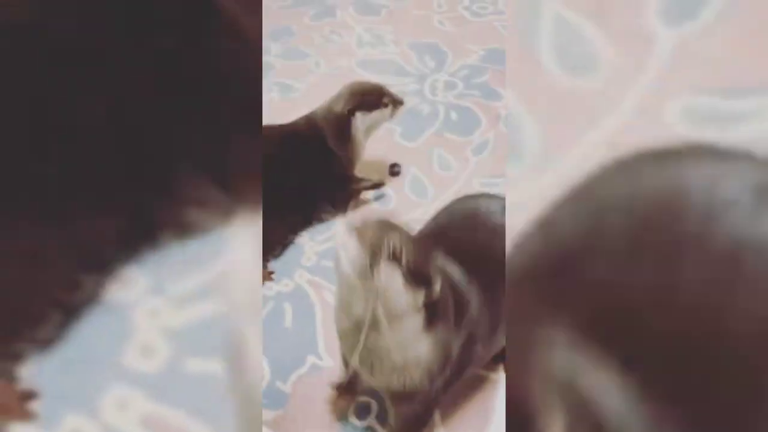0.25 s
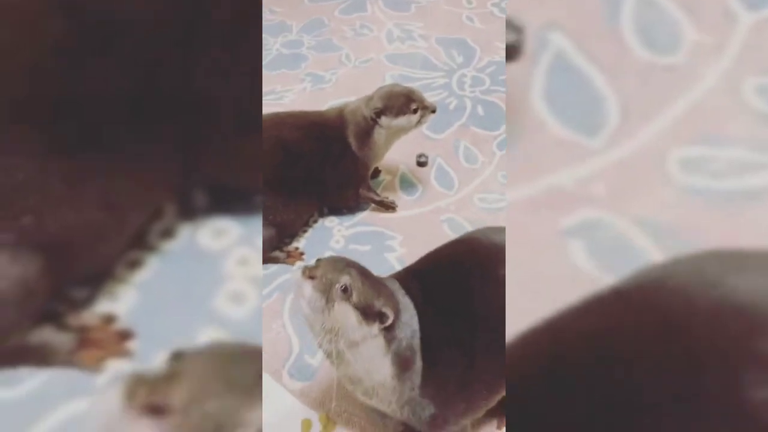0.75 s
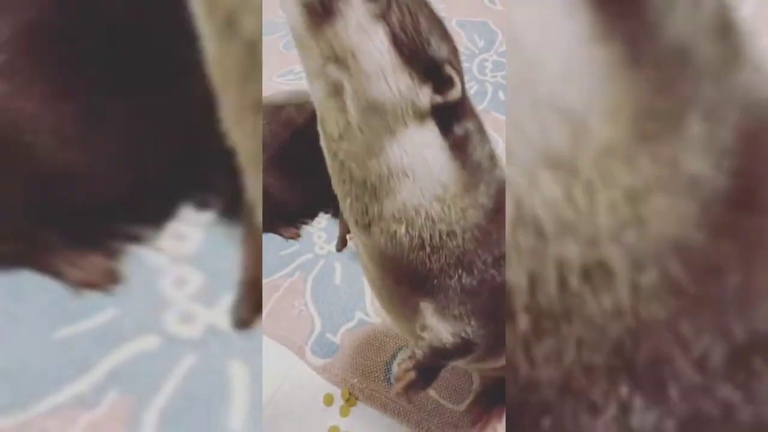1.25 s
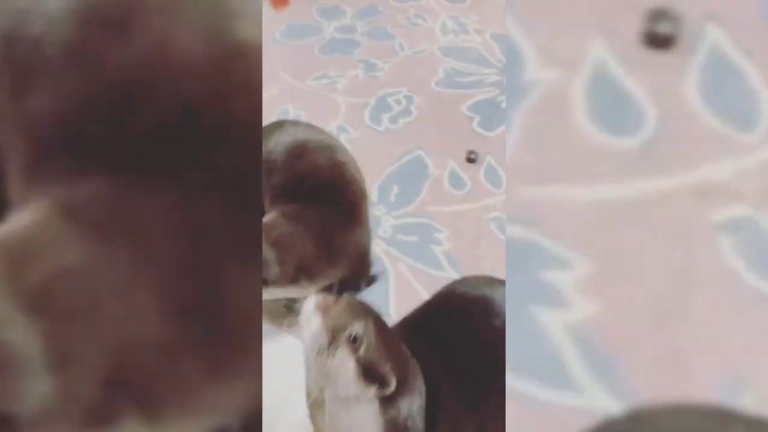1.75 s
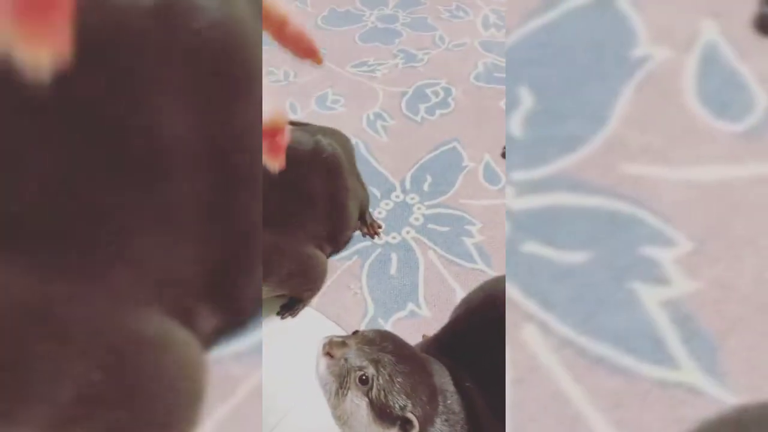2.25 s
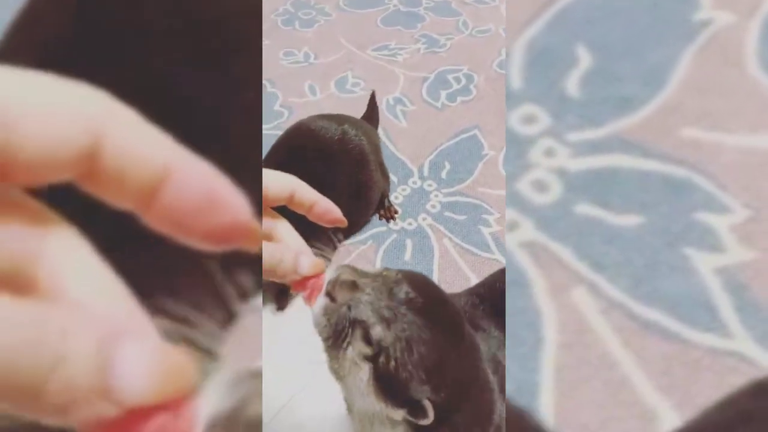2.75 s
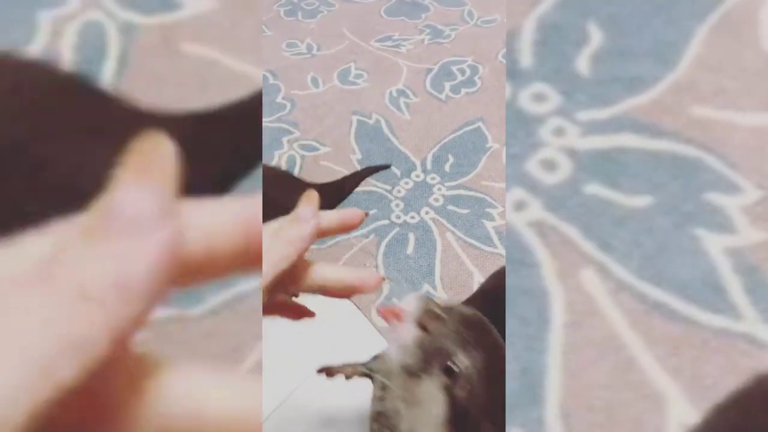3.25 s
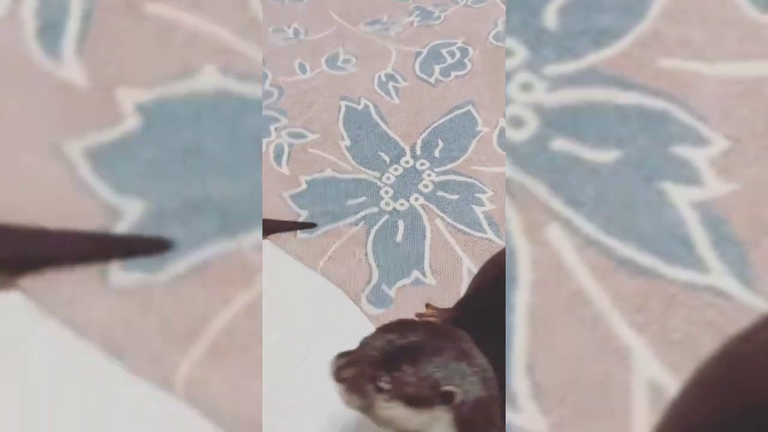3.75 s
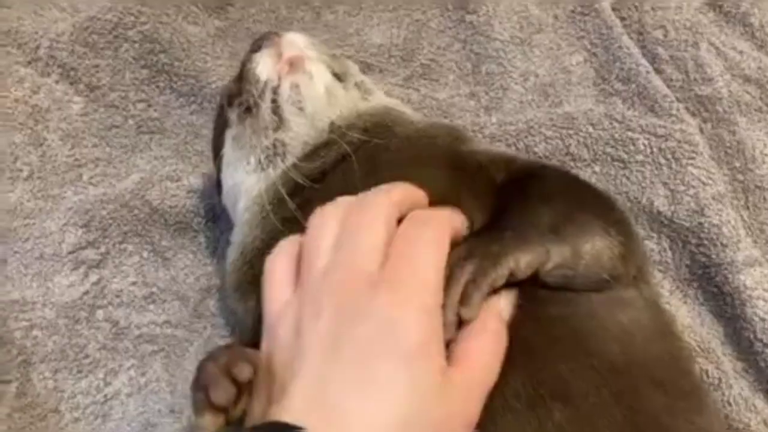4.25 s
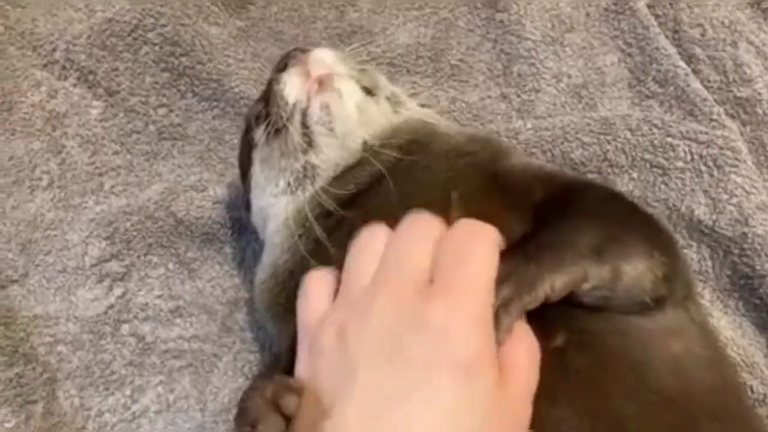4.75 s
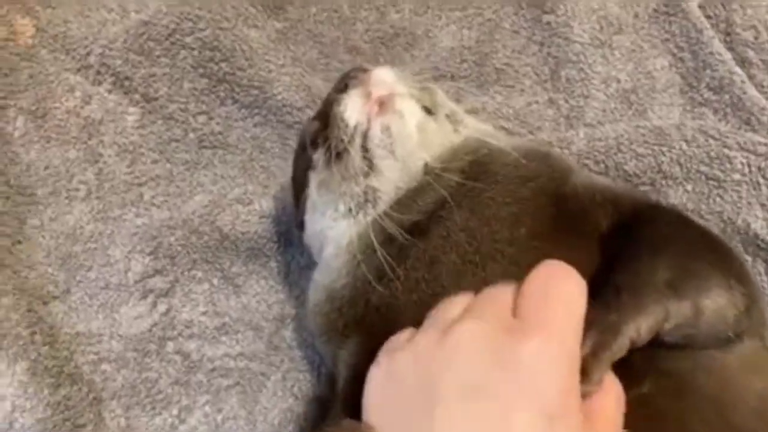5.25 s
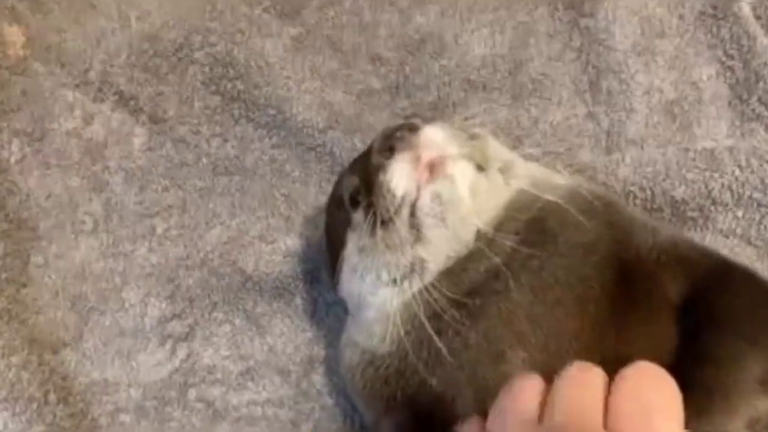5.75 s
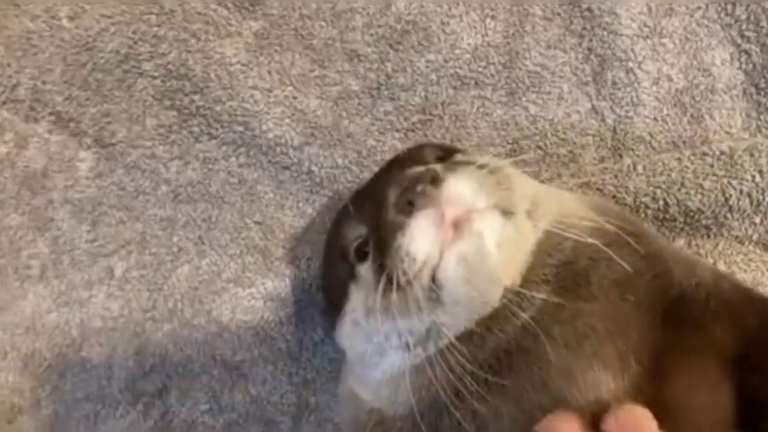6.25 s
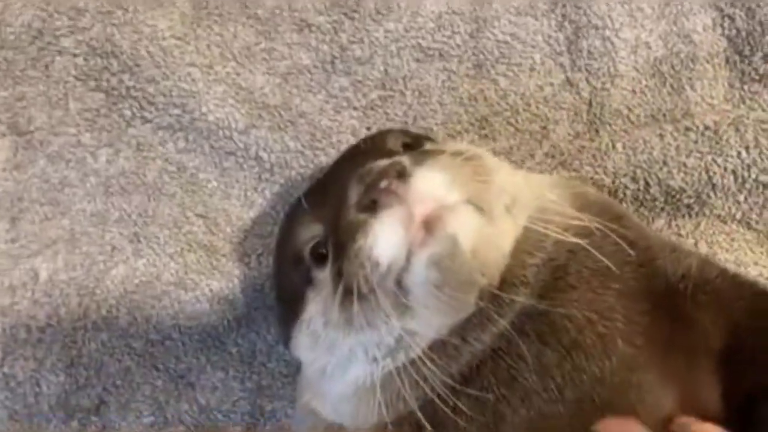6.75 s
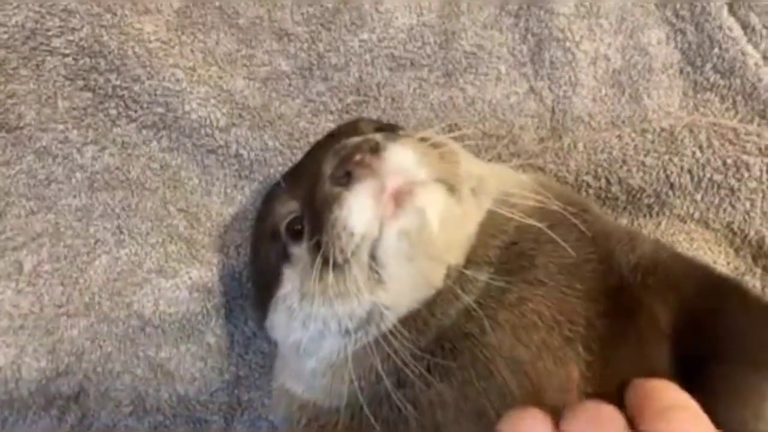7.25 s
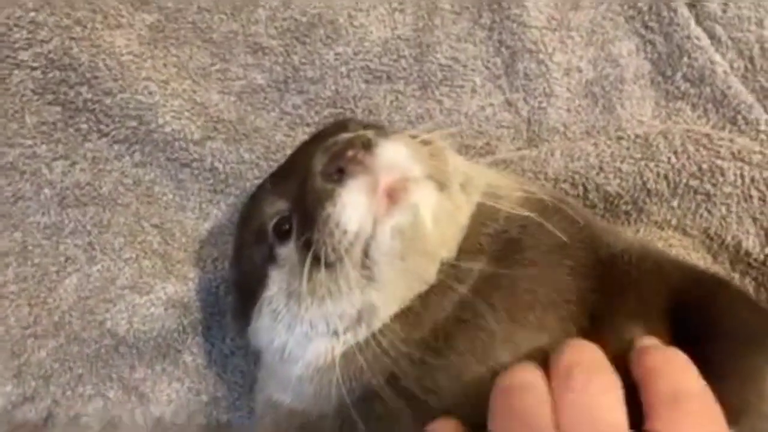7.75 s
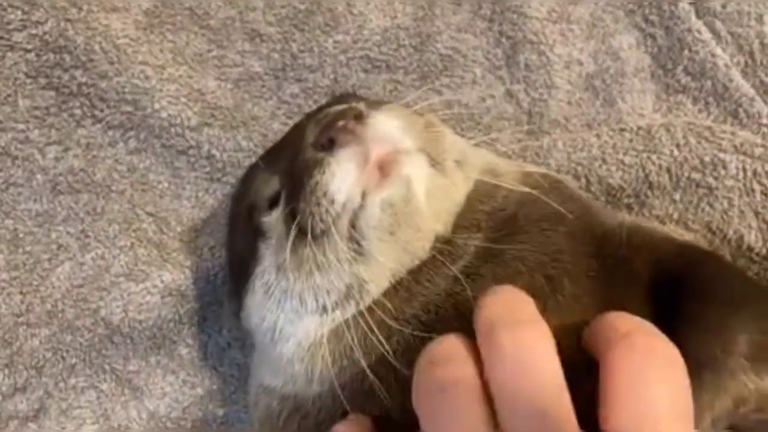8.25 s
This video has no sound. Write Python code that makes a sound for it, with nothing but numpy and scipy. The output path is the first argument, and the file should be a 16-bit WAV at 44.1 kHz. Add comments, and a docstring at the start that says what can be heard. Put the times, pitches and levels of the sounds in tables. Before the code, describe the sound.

In a quiet small room, the high echo of an earlier otter squeak fades within the first fraction of a second. Soft low paw thuds come at 0.1 and 0.3 s, with a tiny peep at 0.2 and a claw tick at 0.4. Around 1.3-1.5 s a piercing squeak jumps up, then slides down hoarsely amid thuds and scuffing; a faint peep follows at 1.6. Another very short, harsh squeak snaps out at 2.85, then a softer falling peep at 3.0. Claws, paws and fur rustle until 3.9. After a brief silence, at 4.0 a steady, fuzzy appliance hum with rushing air begins abruptly, with the tail of a nasal whine. Close, thin otter whines follow at 4.9-5.15, a long sagging one at 6.3-7.0, and a bright, rough-starting one at 8.0-8.4, each flicking down at its end. Only hum and faint hiss fill the pauses.

```python
"""Pet otters in two rooms, one after the other. At first an earlier squeak dies away and otters beg on a rug:
shrill squeaks and small peeps (harmonics on a sliding pitch, noise where the air rushes hoarsely), thudding
paws (decaying floor modes), ticking claws and brushing fur (shaped noise). After a brief silence an otter
whines in long, mostly falling notes (harmonics through throat resonances) over an appliance's steady hum
(trembling sinusoids and noise)."""
import sys
import numpy as np
from scipy import signal
from scipy.fft import rfft, irfft, next_fast_len
from scipy.io import wavfile
from scipy.ndimage import map_coordinates

SR = 44100
rng = np.random.default_rng(int(sys.argv[2]) if len(sys.argv) > 2 else 0)


def int16_out(signal):
    """Quantize to a 16-bit WAV file."""
    q = np.round(np.clip(np.atleast_2d(signal).T, -1, 1) * 32767)
    wavfile.write(sys.argv[1], SR, q.astype(np.int16))


N = 375291
T = np.arange(N) / SR
FIRST_ENDS_S, SECOND_STARTS_S = 3.905, 4.001
TOP_HZ = 9900  # band limit

# Background air of each room: (frequency [Hz], relative level [dB])
FIRST_AIR = [(25, -19), (70, 1), (105, -11), (210, -11.5), (350, -15.5), (750, -28.5), (4500, -51.5),
             (9700, -48)]
SECOND_AIR = [(25, -12), (80, -6), (140, -4), (200, -8.5), (330, -10.5), (750, -8), (1200, -13.5),
              (2500, -23.5), (4500, -29), (7600, -42), (9700, -78)]
# Appliance tones: (frequency [Hz], nominal level [dB rms])
HUM_LINES = [(241, -56.5), (404, -61.5), (436, -67.5), (645, -66.5), (883, -67.5)]
# Left-right correlation of diffuse sound: (frequency [Hz], correlation [-1 to 1])
STEREO_LIKENESS = [(60, 0.91), (250, 0.85), (550, -0.37), (1500, -0.33), (9000, 0.069)]
# Reverberation of each room: (frequency [Hz], 60 dB decay time [s])
FIRST_ROOM_DECAY = [(1000, 0.34), (3500, 0.41), (9000, 0.25)]
SECOND_ROOM_DECAY = [(1000, 0.23), (3500, 0.61), (9000, 0.65)]

# Bodies shifting on the rug: (time [s], half length [s], scuff level [dB], nominal fur level [dB])
SHIFTS = [(0.463, 0.12, -61.5, -55), (1.4, 0.18, -57.5, -70), (1.755, 0.077, -54.5, -48),
          (2.495, 0.063, -61.5, -60.5), (3.243, 0.047, -58, -56.5), (3.43, 0.13, -57, -61),
          (3.765, 0.13, -61, -58), (3.894, 0.069, -53.5, -49)]
# Spectra of scuffing and of fur: (frequency [Hz], relative level [dB])
SCUFF_SPECTRUM = [(300, -1), (600, -2), (1200, -1), (2200, -6.5), (3200, -12), (4500, -11), (5800, -40),
                  (9000, -36.5)]
FUR_SPECTRUM = [(4000, -34.5), (6000, -25), (7200, -4), (8300, 1.5), (9600, -7.5)]
FIDGET_DB = -70.5  # faint scuffing throughout the first room

# Footfalls: (time [s], relative level [dB])
FOOTFALLS = [(0.134, -43.5), (0.294, -38.5), (1.403, -35.5), (1.454, -37), (1.669, -44.5), (1.884, -41),
             (3.373, -40), (3.849, -41.5)]
# Floor modes: (nominal frequency [Hz], nominal relative level [dB], 60 dB decay time [s])
FLOOR_MODES = [(68.3, -4.5, 0.42), (119.6, -13, 0.24), (158.5, -4.5, 0.07), (264, -13.5, .1)]
# Claw ticks: (time [s], knock level [dB], snap relative to knock [dB])
CLAW_TICKS = [(0.131, -46, -35), (0.416, -44, -18), (1.255, -51, -30), (3.244, -40, -24), (3.604, -52, 0)]
# Spectra of a tick's two parts: (frequency [Hz], relative level [dB])
KNOCK_SPECTRUM = [(300, -13), (1300, 3), (2000, -8), (4000, -41)]
SNAP_SPECTRUM = [(1500, -17), (4000, 1), (9000, -10)]
TICK_T60_S = .03

# Squeaks and peeps: (start [s], rise [s], fall [s], start pitch [Hz], crest pitch [Hz], end pitch [Hz],
# fundamental base level [dB], overtone base level [dB], swell [dB], fade [dB])
SQUEAKS = [(1.339, 0.036, 0.016, 6250, 6790, 6370, -27, -80, 24, 4),
           (1.375, 0.0032, 0.0074, 7960, 7650, 7100, -34, -80, 5, 8),
           (1.391, 0.026, .085, 5450, 4230, 3100, -23.5, -30, 11, 10),
           (2.835, 0.0122, .011, 5600, 4730, 4400, -14.5, -17, 10, 10),
           (2.857, 0.0043, 0.0085, 3810, 3560, 3150, -20, -10, 10, 20)]
PEEPS = [(.215, .017, .018, 1350, 1230, 970, -45, -75, 8, 7),
         (1.596, .02, .012, 1625, 1460, 1250, -51, -75, 9, 2),
         (3.005, .009, .097, 1740, 1550, 1270, -39.5, -40, 0, 11)]
# Throat colour of their overtones: (frequency [Hz], gain [dB])
SQUEAK_THROAT = [(6200, -4.5), (7000, 0.5), (8400, 0), (9500, 0.5), (10500, -10.5)]
PEEP_THROAT = [(2500, -3), (3000, 4), (3500, -8), (4150, 0), (5200, -16), (6400, -3), (7200, -1),
               (8400, -6), (9700, -15)]
# Colour of a squeak's fundamental: (frequency [Hz], gain [dB])
SQUEAK_MOUTH = [(3100, 4), (3600, 2.5), (4000, 5), (4250, -7), (4600, -4), (4850, 2.5), (5500, 3)]
# Hoarse air in forced squeaks: (time [s], level [dB], half length [s], lowest frequency [Hz], highest [Hz])
HOARSE_BURSTS = [(1.376, -35, .013, 6500, 8800), (1.408, -38, .02, 5000, 9900),
                 (1.495, -39, .03, 3150, 4100), (1.49, -60, .07, 1900, 2300),
                 (2.843, -37, .016, 3500, 9900), (2.859, -26, .013, 3500, 9900),
                 (2.868, -31, .012, 3150, 3600)]
# Echo of an earlier squeak: (centre frequency [Hz], nominal level at the outset [dB])
DYING_ECHO = [(4800, -51.5), (5400, -43.5)]
DYING_T60_S = .36

# Whines: (start [s], mouth opens [s], end [s], mouth closing time [s], fundamental base level [dB],
# overtone base level [dB], upper resonance before jaw slide [Hz], its lift [dB])
WHINES = [(3.805, 3.85, 4.104, .018, -41.5, -43.5, 7100, 16),
          (4.893, 4.925, 5.146, .042, -42, -42, 6800, 10),
          (6.311, 6.356, 7.024, .016, -39, -32.7, 7450, 12.5),
          (8.02, 8.062, 8.422, .014, -40.5, -37, 6600, 17)]
# Tune of each whine, a list apiece: (time [s], nominal pitch [Hz])
WHINE_TUNES = [
    [(4.005, 879.7), (4.085, 870)],
    [(4.905, 1229), (4.92, 1322), (4.942, 1180), (4.988, 1134), (5.005, 1036), (5.024, 1086), (5.09, 1074),
     (5.105, 1051)],
    [(6.338, 1228), (6.38, 1048), (6.41, 1019), (6.44, 1070), (6.455, 1002), (6.49, 948), (6.53, 993),
     (6.575, 930), (6.605, 943), (6.65, 863), (6.706, 830), (6.735, 869.7), (6.83, 853.3), (6.905, 907),
     (6.945, 844), (6.968, 835), (7.0, 884)],
    [(8.022, 1344), (8.0595, 1208), (8.06, 1002), (8.082, 994), (8.1, 1067), (8.135, 950), (8.157, 990),
     (8.18, 939.4), (8.225, 996), (8.245, 972), (8.267, 1006), (8.3, 964), (8.342, 916), (8.405, 906)],
]
# Throat colour of a whine's overtones, before jaw slide: (frequency [Hz], gain [dB])
WHINE_THROAT = [(1750, -6.5), (2100, 4), (2500, 1.5), (2850, 2.5), (3100, -5.5), (3450, 1.5), (3850, 6),
                (4300, -2), (4800, -7), (5250, -18.5), (6000, -18.5), (7600, -19), (8300, -31),
                (9300, -67.5)]
# Nasal colour of a whine's fundamental: (frequency [Hz], gain [dB])
WHINE_NOSE = [(780, 4), (870, 4.5), (960, 0.5), (1300, -1)]
# Strained voice: (time [s], half length [s], extra roughness [multiple of usual], half-harmonics [dB])
STRAINS = [(4.05, .06, 1.5, -13), (4.93, .04, 4, -28), (5.055, .04, 3, -12), (6.44, .025, 2, -26),
           (6.715, .05, 1, -19), (8.08, .03, 7, -10)]
# Thin nasal hiss after a whine: (time [s], level [dB])
NOSE_HISSES = [(4.28, -65.5), (7.13, -64.5)]
# The mouth at the two microphones: (frequency [Hz], left minus right [dB], left phase lead [rad])
SQUEAK_SEAT = [(1450, -6, 1.1), (3550, -2.5, 2.2), (4150, -3, 1.6), (4900, -1, 2.2), (7000, 0, 4.7),
               (8350, 0, 6.2), (9400, 0, 6.5)]
WHINE_SEAT = [(950, 10, 1.3), (1850, 7, 2.6), (2750, 3.5, 2.85), (3080, .5, 3.15), (3500, 2.5, 4.1),
              (4870, 0, 6.0), (6000, -1.5, 7.3), (7000, 0, 6.2)]

ONSET_DB, ONSET_S = 26, .011  # initial deficit of overtones and its time constant
LIPS_HZ, MUFFLE_DB, OPEN_S = 2600, 24, .02  # muffling above LIPS_HZ by a closed mouth
CREST_S, SAG_DB_PER_S = 0.22, 11  # overtones crest at this age
CLOSE_DB, CLOSE_DROP = 45, .15  # loss of overtones and fractional fall of pitch as the mouth shuts
JAW_SHARE_PER_S, UPPER_WIDTH_HZ = 0.081, 1300  # fractional slide of resonances as the jaw relaxes
SWAY_S, SWAY_PER_S = 1e-5, 14  # scale of arrival shift, random knots a second


def amp(db):
    """Amplitude ratio follows from level by the decibel law."""
    return 10 ** (np.asarray(db) / 20)


def unit(x):
    """Normalisation to unit mean square fixes the power of a signal."""
    return x / np.sqrt(np.mean(x ** 2) + 1e-20)


def along(points, hz):
    """Linear interpolation on a logarithmic frequency axis."""
    f, v = np.transpose(points)
    return np.interp(np.log(hz + 1), np.log(f + 1), v)


def wobble(rate, t):
    """Spline interpolation of random knots, rate a second, gives a smooth fluctuation."""
    u = (t - t[0]) * rate
    return map_coordinates(rng.standard_normal(int(u[-1]) + 4), [u])


def filtered(x, response):
    """Linear filtering multiplies the spectrum by a frequency response."""
    m = next_fast_len(N + SR // 2)
    return irfft(rfft(x, m) * response(np.fft.rfftfreq(m, 1 / SR)), m)[..., :N]


def rush(spectrum):
    """Diffuse noise of unit power: mixing mid and side sets the correlation of the two channels."""
    def mid_side_response(hz):
        angle = np.arccos(np.clip(along(STEREO_LIKENESS, hz), -1, 1)) / 2
        return amp(along(spectrum, hz)) * [np.cos(angle), np.sin(angle)]
    mid, side = filtered(rng.standard_normal((2, N)), mid_side_response)
    return unit(np.array([mid + side, mid - side]))


def room(x, decay, early_db, late_db, early_t60, blur_hz):
    """Reverberation: a quick flurry from near surfaces, then a diffuse tail in which the pitch blurs."""
    hz, t, z = signal.stft(rng.standard_normal((2, SR // 2)), SR, nperseg=256)

    def answer(sound, t60):
        h = signal.istft(z * amp(-60 * t / t60), SR, nperseg=256)[1]
        # the first reflection comes 1/300 s after the direct sound
        h = np.pad(h / np.linalg.norm(h[0]), ((0, 0), (SR // 300, 0)))
        return signal.fftconvolve(sound[None], h, axes=1)[:, :N]
    blurred = x * unit(wobble(blur_hz, T))
    early = amp(early_db) * answer(x, early_t60)
    late = amp(late_db) * answer(blurred, along(decay, hz)[:, None])
    return early + late


def placed(x, seat):
    """A near source reaches two microphones with differences of level and phase."""
    hz, level_db, lead = np.transpose(seat)
    sides = np.array([[1], [-1]]) / 2

    def response(f):
        gains = amp(sides * along(np.c_[hz, level_db], f))
        balanced = gains / np.sqrt(np.mean(gains ** 2, 0))
        return balanced * np.exp(1j * sides * along(np.c_[hz, lead], f))
    return filtered(x, response)


def first_air():
    """Broadband noise with a slowly wandering level forms the background of the first room."""
    return amp(-57.5 + 0.42 * wobble(5.0, T)) * rush(FIRST_AIR)


def hum():
    """Random modulation widens an appliance's tones into fuzzy lines, over rushing air in the second room."""
    lines = 0
    for hz, db in HUM_LINES:
        tremble = amp(2.8 * wobble(15, T)) * np.exp(.95j * wobble(15, T))
        lines = lines + amp(db) * np.sqrt(2) * (tremble * np.exp(2j * np.pi * hz * T)).imag
    return lines + amp(-49.0 + 1.26 * wobble(14, T)) * rush(SECOND_AIR)


def rustle():
    """Friction makes noise: each shift of a body swells the scuffing, with a soft high hiss of fur."""
    s, half_s, scuff_db, fur_db = np.transpose(SHIFTS)
    swells = np.exp(-((T - s[:, None]) / half_s[:, None]) ** 2)
    scuff = np.hypot(amp(FIDGET_DB), amp(scuff_db) @ swells)
    fur = amp(fur_db) @ swells
    grain = amp(2.2 * wobble(90, T))
    return scuff * unit(grain * rush(SCUFF_SPECTRUM)) + fur * amp(1.6 * wobble(37, T)) * rush(FUR_SPECTRUM)


def footfalls():
    """Modal excitation: a soft impact sets decaying floor modes booming."""
    t = np.arange(SR // 2) / SR
    thuds = np.zeros(N + SR)
    for s, db in FOOTFALLS:
        ring = 0
        for hz, level, t60 in FLOOR_MODES:
            decay = amp(level + rng.normal(0, 2.5) - 60 * t / t60)
            ring = ring + decay * np.sin(2 * np.pi * hz * (1 + rng.normal(0, 0.042)) * t)
        soft_onset = 1 - np.exp(-t / 0.0033)
        thuds[round(s * SR):][:len(t)] += amp(db + 6.5) * ring * soft_onset
    return thuds[:N]


def claws():
    """A hard impact excites a broad spectrum: each tick is decaying noise, a knock and a sharper snap."""
    knocks, snaps = np.zeros(N), np.zeros(N)
    for s, db, sharp_db in CLAW_TICKS:
        tick = (T > s) * amp(db - 60 * np.abs(T - s) / TICK_T60_S)
        knocks = knocks + tick
        snaps = snaps + amp(sharp_db) * tick
    return knocks * rush(KNOCK_SPECTRUM) + snaps * rush(SNAP_SPECTRUM)


def voice(calls, jitter, jitter_rate, shimmer_db, flutter_db, rasp_db, rasp_hz, edge):
    """Source and filter: vocal folds give harmonics of a trembling pitch, and the throat shapes them."""
    out = np.zeros(N)
    k = np.r_[1, np.arange(4, 23) / 2][:, None]  # orders 1, 2, 2.5, 3 ... 11
    for t, pitch, low_db, colour, split, rough in calls:
        pitch = pitch * (1 + jitter * np.sqrt(rough) * wobble(jitter_rate, t))
        phase = 2 * np.pi * np.cumsum(pitch) / SR
        hz = k[1:] * pitch
        # in a split voice every second cycle differs, which puts lines between the upper overtones
        half_orders = split * np.minimum(k[1:] / 3.5, 1) ** 3
        between = np.where(k[1:] % 1 > 0, half_orders, 1)
        overtones = amp(colour(hz)) * between / (1 + (hz / TOP_HZ) ** 40)
        gains = np.vstack([amp(low_db), overtones])
        # each harmonic flutters in level, and carries a skirt of rasp that grows with its order
        flutter = amp(flutter_db * np.minimum(k / 3, 1) * np.array([wobble(75, t) for _ in k]))
        skirt = np.array([wobble(rasp_hz, t) + 1j * wobble(rasp_hz, t) for _ in k])
        rasp = amp(rasp_db) * rough * np.sqrt(k) * skirt
        partials = gains * flutter * (1 + rasp) * np.exp(1j * k * phase)
        wave = np.sqrt(2) * partials.imag.sum(0)
        gate = np.clip(np.minimum(t - t[0], t[-1] - t) / (2 * edge), 0, 1)
        shimmer = amp(shimmer_db * wobble(150, t))
        out[round(t[0] * SR):][:len(t)] += wave * np.sin(gate * np.pi / 2) ** 2 * shimmer
    return out


def during(start, end):
    """Sampling in time: the sample times of one call."""
    return T[(T >= start) & (T < end)]


def dying_squeak():
    """Exponential decay: narrow bands of noise are the echo of an earlier squeak."""
    echo = 0
    for hz, db in DYING_ECHO:
        level_db = db - 60 * T / DYING_T60_S + 2.5 * wobble(70, T)
        band = [(hz - 500, -45), (hz - 150, 0), (hz + 150, 0), (hz + 300, -45)]
        echo = echo + amp(level_db) * rush(band)
    return echo


def hoarse():
    """Turbulence: air forced past the folds gives short swells of band-limited noise."""
    air = 0
    for s, db, half, low_hz, high_hz in HOARSE_BURSTS:
        band = [(low_hz / 2, -60), (low_hz * .85, -30), (low_hz, 0),
                (high_hz, 0), (high_hz * 1.15, -30), (high_hz * 2, -60)]
        air = air + amp(db) * np.exp(-((T - s) / half) ** 2) * rush(band)
    return air


def chirp(row, throat, sag_power, dull_db=0, fray=0, mouth=None):
    """Pitch glide: a short call swells toward its crest, then fades; it may fray or grow dull."""
    start, rise_s, fall_s, start_hz, crest_hz, end_hz, low_db, high_db, swell_db, fade_db = row
    t = during(start, start + rise_s + fall_s)
    to_go = np.clip(1 - (t - start) / rise_s, 0, 1)
    spent = np.clip((t - start - rise_s) / fall_s, 0, 1)
    pitch = crest_hz + (start_hz - crest_hz) * to_go + (end_hz - crest_hz) * spent ** sag_power
    effort_db = -swell_db * to_go - fade_db * spent
    mouth_db = along(mouth, pitch) if mouth is not None else 0

    def colour(hz):
        octaves_up = np.log2(np.maximum(hz / LIPS_HZ, 1))
        dullness = 1 - np.exp((start - t) / rise_s) + spent ** 2 * octaves_up
        return high_db + effort_db + along(throat, hz) - dull_db * dullness
    return t, pitch, low_db + effort_db + mouth_db, colour, 0, 1 + fray * spent ** 2


def begging():
    """Direct and reverberant sound: squeaks, peeps and hoarse air ring in the room as an old echo dies."""
    shrill = [chirp(row, SQUEAK_THROAT, sag_power=2.1, fray=2.005, mouth=SQUEAK_MOUTH) for row in SQUEAKS]
    soft = [chirp(row, PEEP_THROAT, sag_power=0.92, dull_db=11) for row in PEEPS]
    squeaks = voice(shrill, jitter=.006, jitter_rate=400, shimmer_db=1.7, flutter_db=1.2,
                    rasp_db=-26, rasp_hz=1800, edge=.0009)
    peeps = voice(soft, jitter=.011, jitter_rate=250, shimmer_db=1.2, flutter_db=4.5,
                  rasp_db=-19, rasp_hz=500, edge=.0022)
    calls, air = squeaks + peeps, hoarse()
    echo = room(calls + air[0], FIRST_ROOM_DECAY, early_db=-18, late_db=-13.5, early_t60=0.055, blur_hz=280)
    return placed(calls, SQUEAK_SEAT) + air + echo + dying_squeak()


def whine(row, tune):
    """Moving resonances: a thin tone brightens as the mouth opens, crests, sags, and flicks down at its shutting."""
    start, opens, end, closing_s, low_db, high_db, upper_hz, lift_db = row
    t = during(start, end)
    age = t - start
    shut = np.maximum(t - end + closing_s, 0) / closing_s
    pitch = np.interp(t, *np.transpose(tune)) * (1 - CLOSE_DROP * shut)
    onset_db = -ONSET_DB * np.exp(-age / ONSET_S)
    effort_db = onset_db - SAG_DB_PER_S * np.abs(age - CREST_S) - CLOSE_DB * shut
    closed = (1 - np.tanh((t - opens) / OPEN_S)) / 2
    jaw = 1 - JAW_SHARE_PER_S * (age - CREST_S)
    s, half_s, extra, split_db = np.transpose(STRAINS)
    strain = np.exp(-((t - s[:, None]) / half_s[:, None]) ** 2)

    def throat_db(hz):
        return along(WHINE_THROAT, hz) + lift_db * np.exp(-((hz - upper_hz) / UPPER_WIDTH_HZ) ** 2)

    def colour(hz):
        muffle_db = MUFFLE_DB * closed * np.clip(2 * np.log2(hz / LIPS_HZ), 0, 1)
        return high_db + effort_db + throat_db(hz / jaw) - muffle_db
    return t, pitch, low_db + along(WHINE_NOSE, pitch), colour, amp(split_db) @ strain, 1 + extra @ strain


def swaying(pair):
    """Path difference: as the head nods, its sound reaches now one microphone, now the other sooner."""
    shift = SWAY_S * SR * wobble(SWAY_PER_S, T)
    return np.array([map_coordinates(x, [np.arange(N) + side * shift]) for x, side in zip(pair, (1, -1))])


def nose_hiss():
    """Turbulence in the nose: a thin high noise swells after a whine."""
    swells = sum(amp(db) * np.exp(-((T - s) / 0.13) ** 2) for s, db in NOSE_HISSES)
    return swells * rush([(6000, -13), (7500, 25.5), (8400, 21.5), (9500, -48)])


def whining():
    """Direct and reverberant sound: the room answers long nasal whines mostly in their overtones."""
    calls = [whine(row, tune) for row, tune in zip(WHINES, WHINE_TUNES)]
    whines = voice(calls, jitter=.004, jitter_rate=150, shimmer_db=.6, flutter_db=1.6,
                   rasp_db=-37, rasp_hz=600, edge=.002)
    overtones = filtered(whines, lambda hz: hz ** 4 / (hz ** 4 + 1200 ** 4))
    echo = room(overtones, SECOND_ROOM_DECAY, early_db=-12, late_db=-17, early_t60=.09, blur_hz=450)
    return swaying(placed(whines, WHINE_SEAT)) + echo + nose_hiss()


def scene():
    """Superposition: sources add within each room, and the rooms follow one another."""
    first = first_air() + rustle() + footfalls() + claws() + begging()
    second = hum() + whining()
    fade = np.clip((FIRST_ENDS_S - T) / .01, 0, 1)
    return first * fade + second * (T > SECOND_STARTS_S)


def record(dry):
    """Band limitation: the microphones lose the deepest bass, and a steep cut removes the highest treble."""
    def response(hz):
        bass_cut = hz ** 3 / (hz ** 3 + 28 ** 3)
        return bass_cut / (1 + (hz / TOP_HZ) ** 120)
    return filtered(dry, response)


dry = scene()
out = record(dry)
int16_out(out)
```